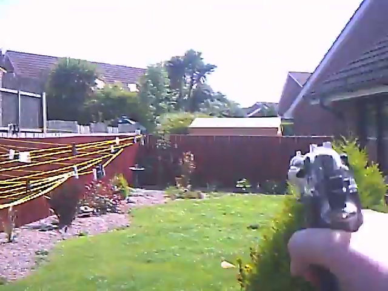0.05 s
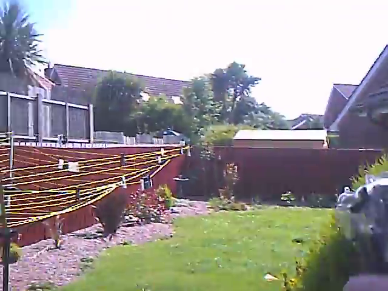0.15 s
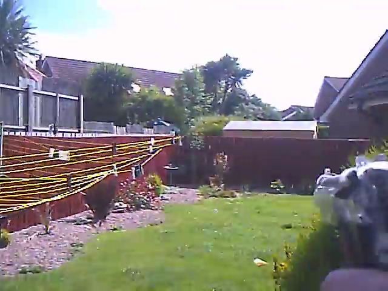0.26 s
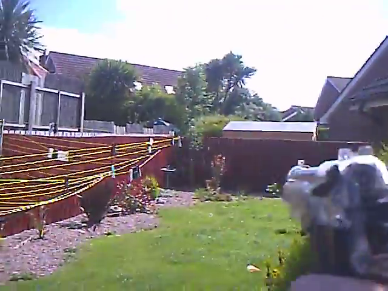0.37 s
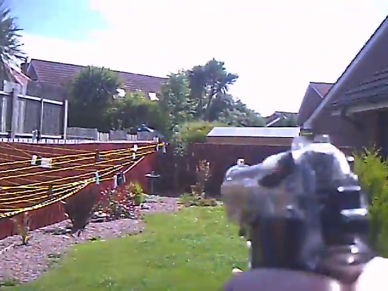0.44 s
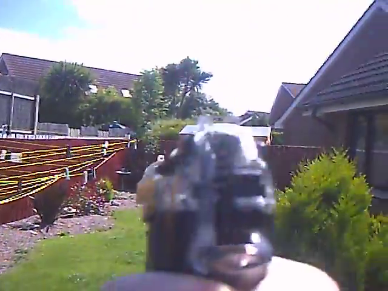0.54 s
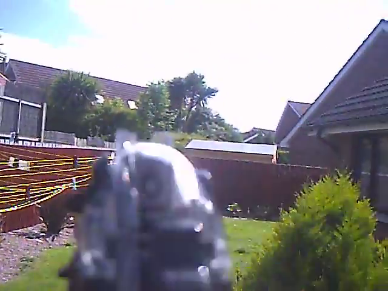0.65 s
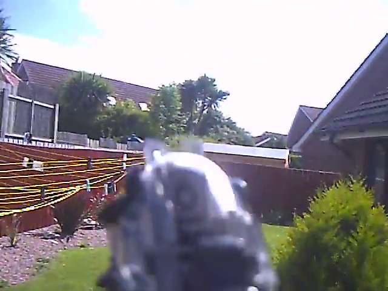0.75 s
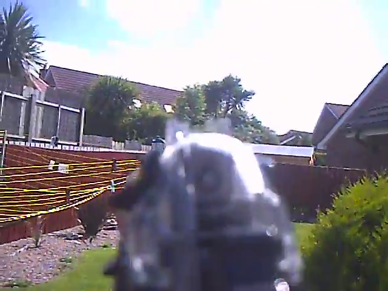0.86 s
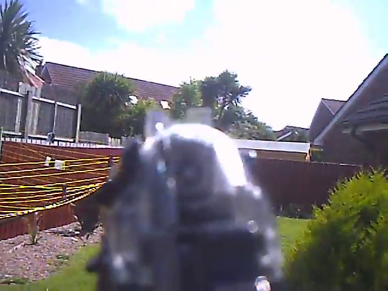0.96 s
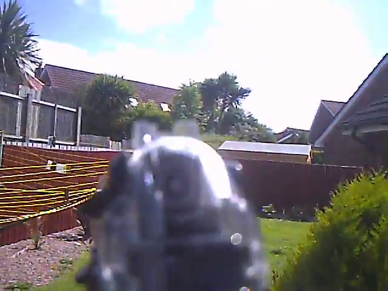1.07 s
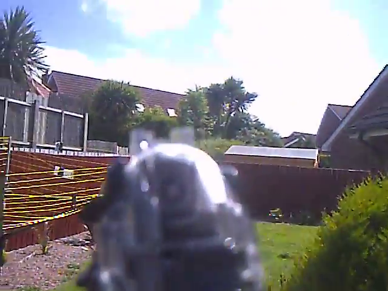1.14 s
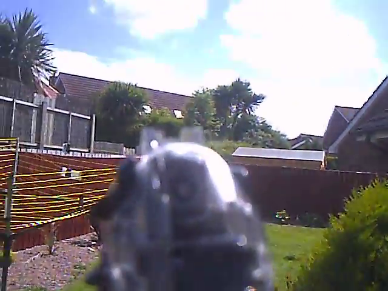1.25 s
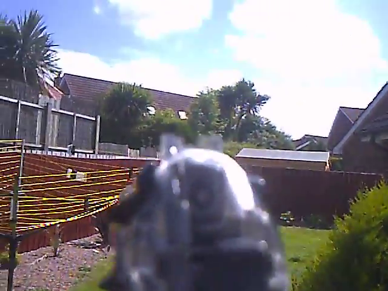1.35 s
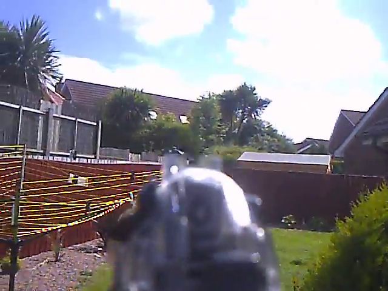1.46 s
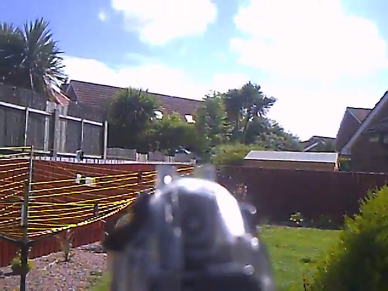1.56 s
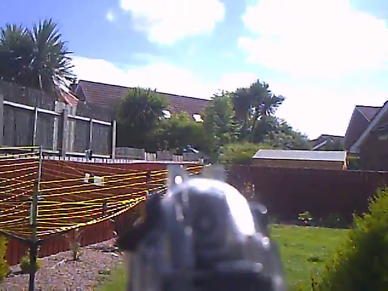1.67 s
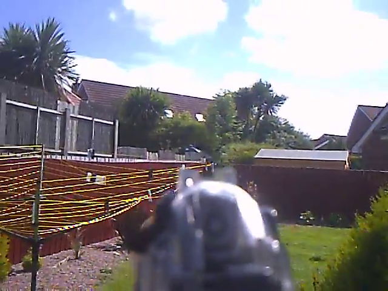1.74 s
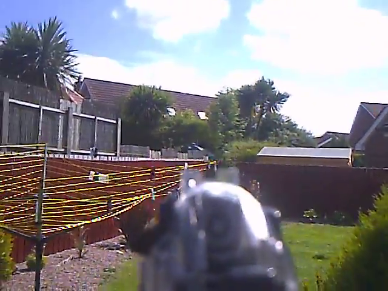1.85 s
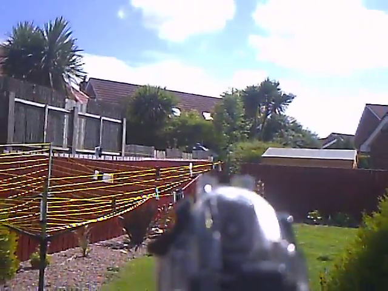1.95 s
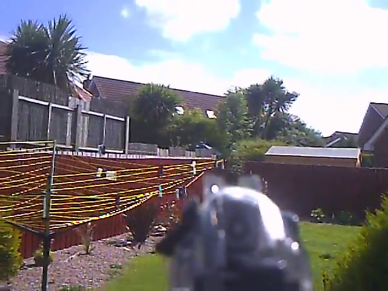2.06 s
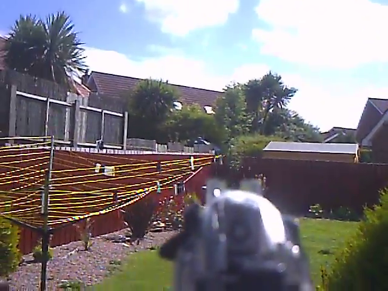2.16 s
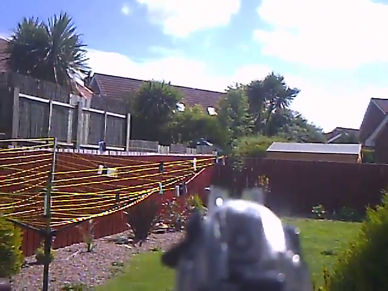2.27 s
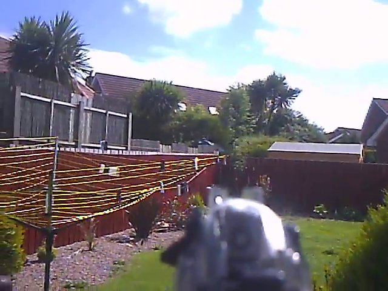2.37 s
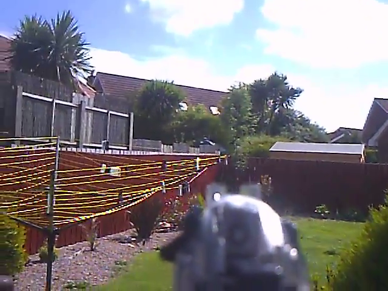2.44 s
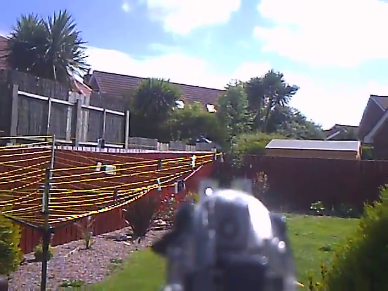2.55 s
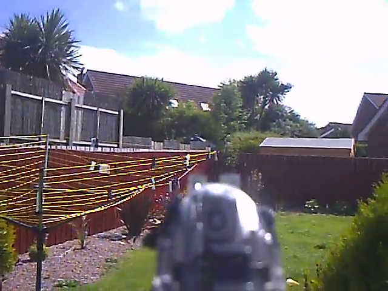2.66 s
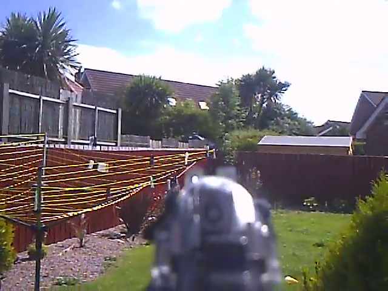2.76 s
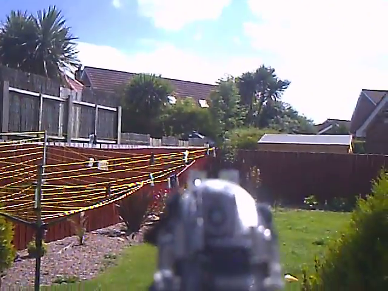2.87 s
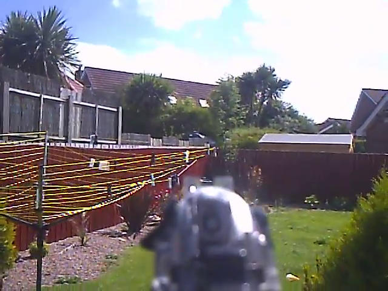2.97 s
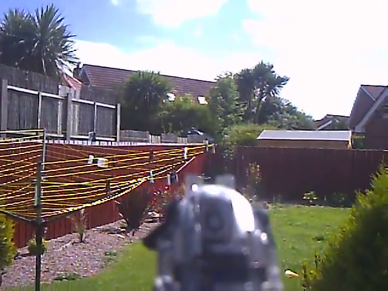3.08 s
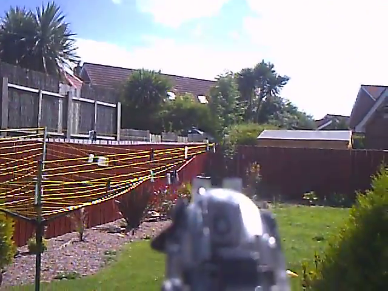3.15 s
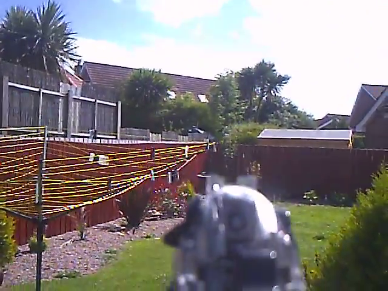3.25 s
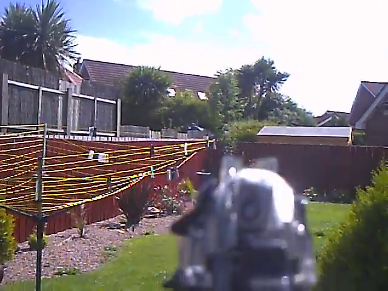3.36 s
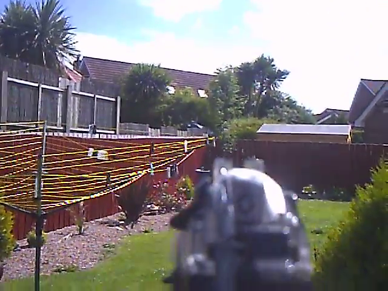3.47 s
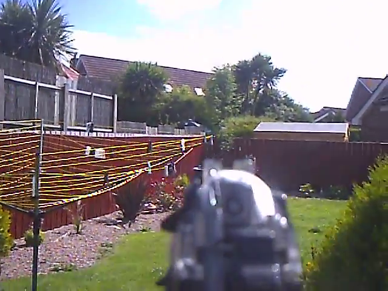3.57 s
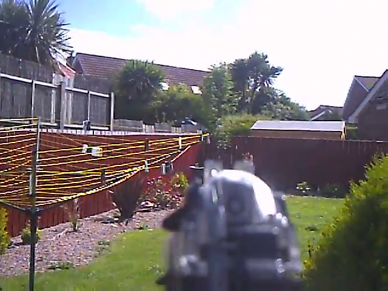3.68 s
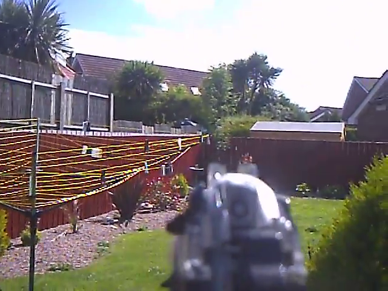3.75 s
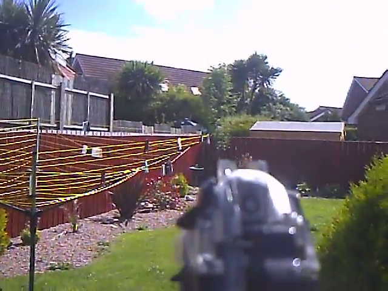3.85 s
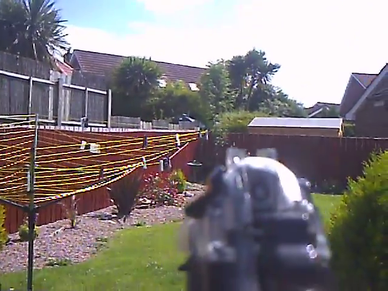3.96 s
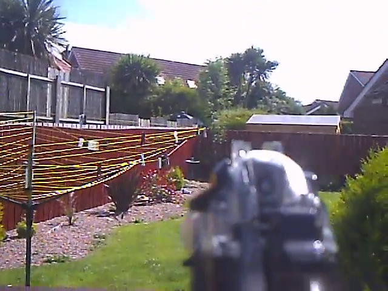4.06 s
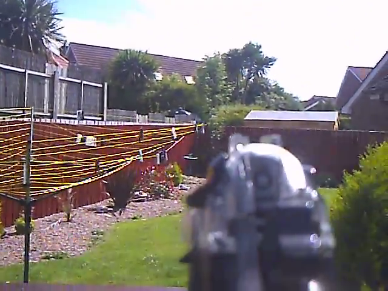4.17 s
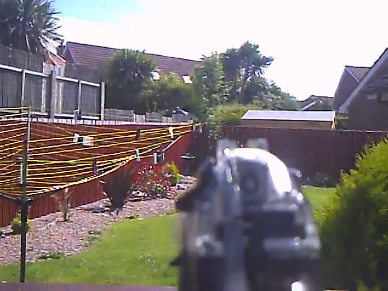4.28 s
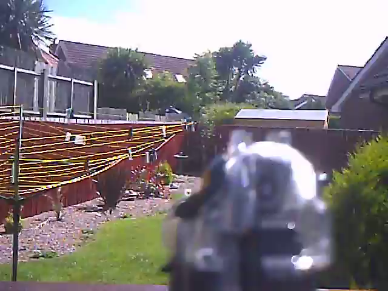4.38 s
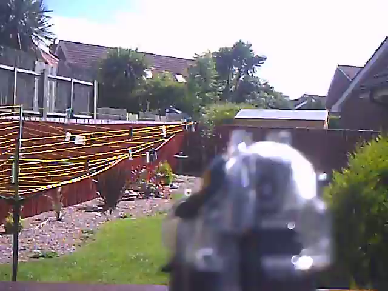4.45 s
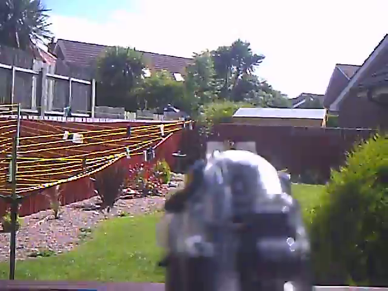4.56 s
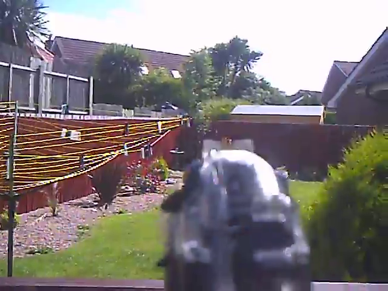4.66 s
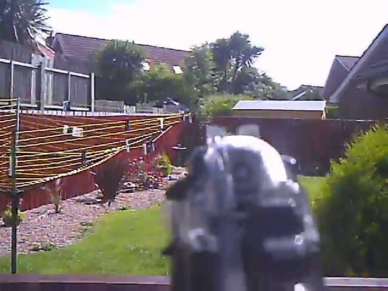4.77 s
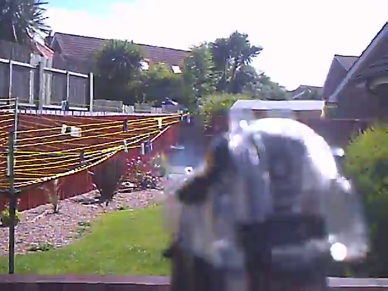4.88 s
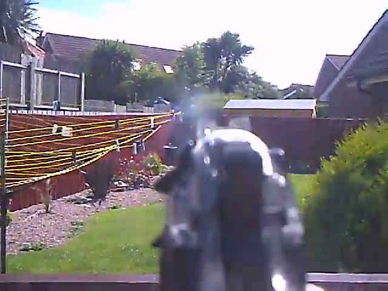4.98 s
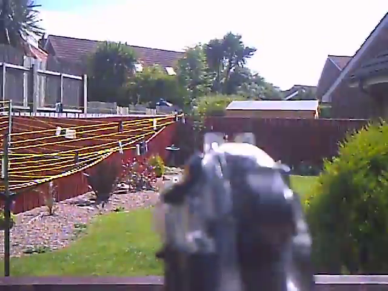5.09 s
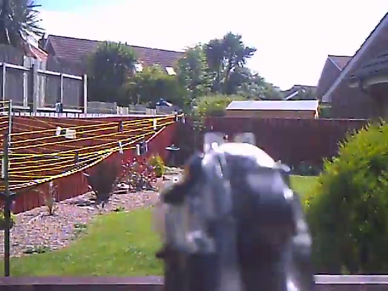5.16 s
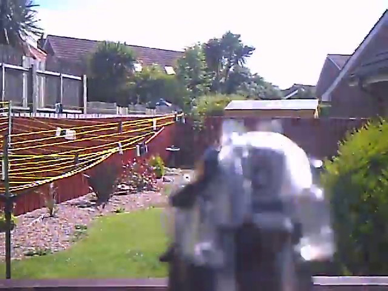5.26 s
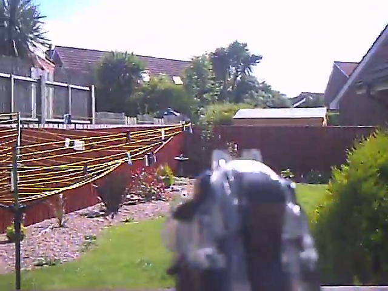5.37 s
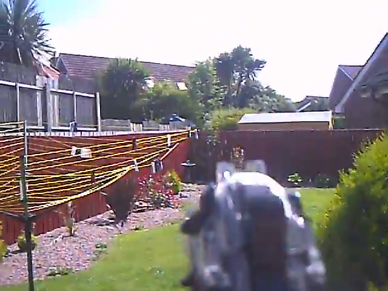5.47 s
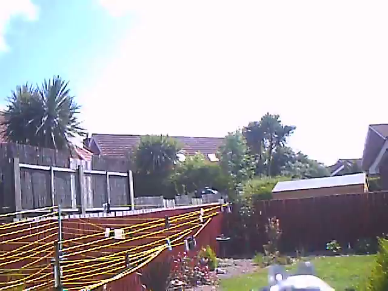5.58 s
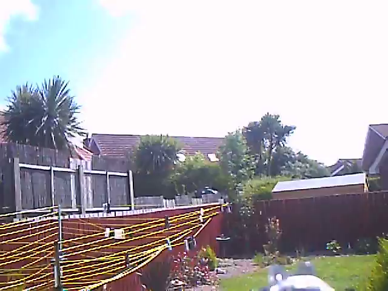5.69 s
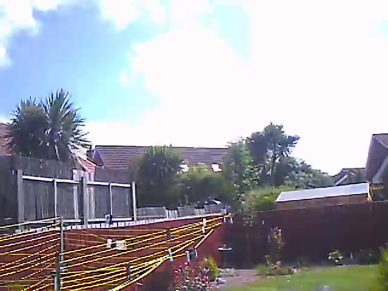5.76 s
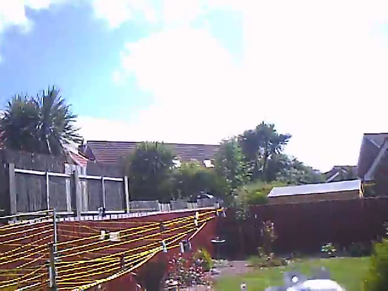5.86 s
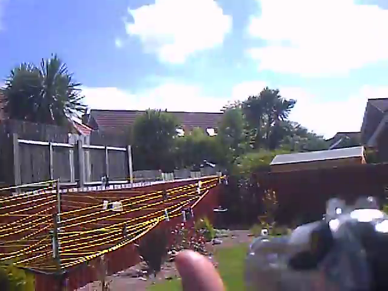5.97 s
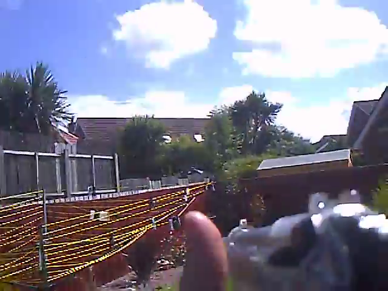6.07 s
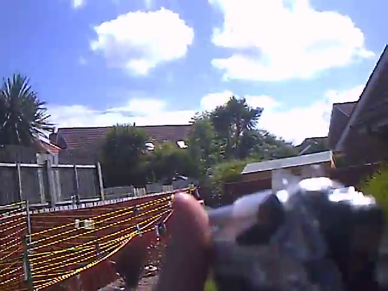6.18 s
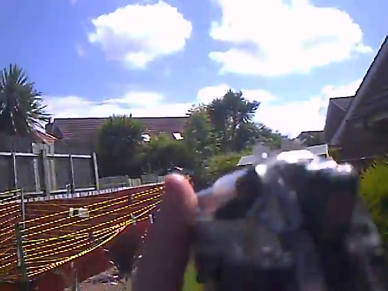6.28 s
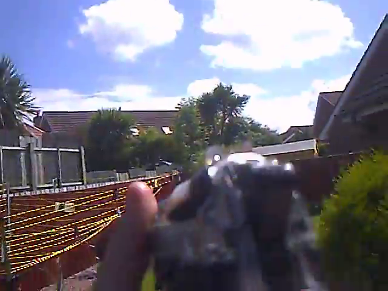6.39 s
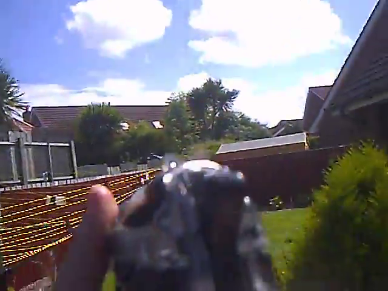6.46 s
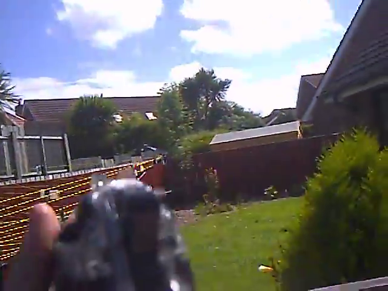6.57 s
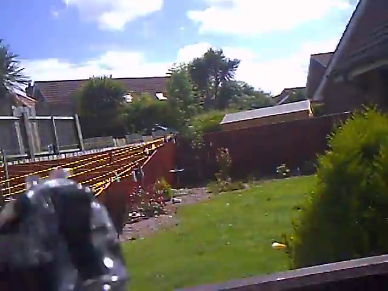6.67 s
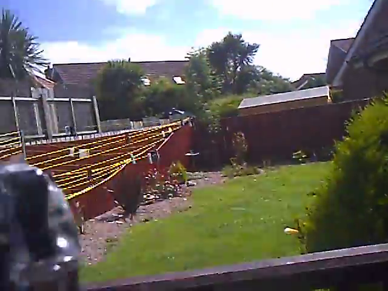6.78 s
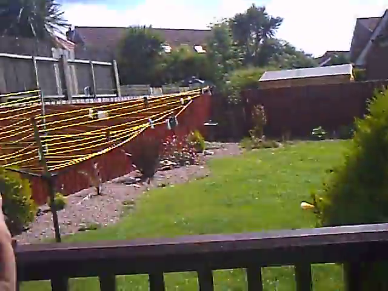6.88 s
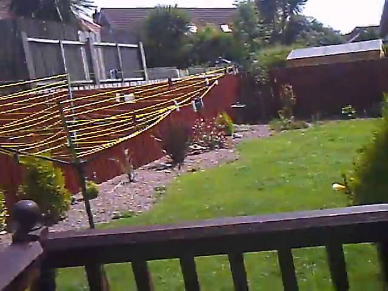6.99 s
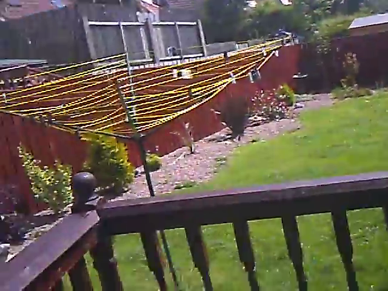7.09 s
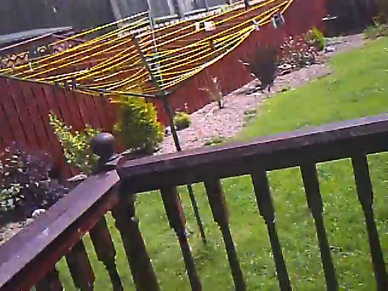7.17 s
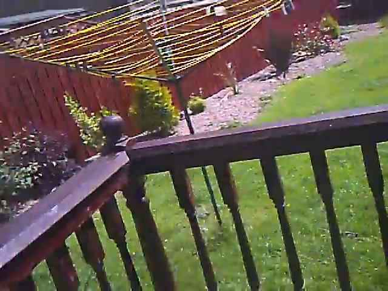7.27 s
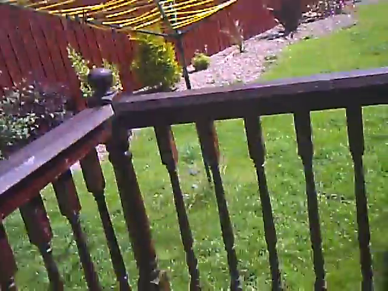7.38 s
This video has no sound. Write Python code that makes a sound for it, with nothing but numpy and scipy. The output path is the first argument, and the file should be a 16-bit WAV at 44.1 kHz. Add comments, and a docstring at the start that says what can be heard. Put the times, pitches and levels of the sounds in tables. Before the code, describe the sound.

A gas airsoft pistol fires eight sharp, clacking shots close by in a garden, with hand creaks and rubs on the microphone.

```python
"""Airsoft pistol in a back garden

Eight shots from a gas blowback pistol, an arm's length from the microphone of a small handheld camera.
Each is a hammer tap, a blast of gas, the slide ringing on its stop and clacking shut; pellets tick on
things further off, over the hum of a distant town. Right at the microphone the hand makes the plastic
case rub and creak. The camera's coarse converter clips the shots and turns the quiet into grainy hiss."""
import sys
import numpy as np
from scipy import signal
from scipy.fft import rfft, irfft
from scipy.io import wavfile

SR = 44100
rng = np.random.default_rng(int(sys.argv[2]) if len(sys.argv) > 2 else 0)


def log_audio(samples):
    """Write samples as a 16-bit WAV file to the path given in sys.argv[1]."""
    # one column per channel
    frames = np.atleast_2d(samples).T
    # limit to full scale, then quantise
    limited = np.clip(frames, -1, 1)
    pcm = np.round(limited * 32767).astype(np.int16)
    wavfile.write(sys.argv[1], SR, pcm)


N = 327663
T = np.arange(SR // 5) / SR  # time within one short sound [s]

# the shots, at arm's length; levels are relative: (time [s], blast level [dB], hammer level [dB],
# delay to the rear stop [s], stop level [dB], delay until the slide shuts [s], shut level [dB])
SHOTS = [(3.3607, 0.5, -35, 0.029, -6.5, 0.058, 1), (4.1092, 0.5, -37.5, 0.028, 1.5, 0.059, 0.5),
         (4.5108, -1.5, -39, 0.026, 3.5, 0.062, 0.5), (4.7815, -1.5, -39, 0.026, 3.5, 0.06, 1),
         (5.027, -2, -45, 0.028, 2.5, 0.06, 2), (5.25, -3.5, -44, .0303, 2, 0.059, 1),
         (5.7655, -2, -24, .0315, -4, 0.055, 1.5), (6.327, -2.5, -19, 0.029, -11.5, 0.049, 1.5)]
# colour of the gas blast: (frequency [Hz], level [dB])
GAS_COLOUR = [(20, -27.5), (60, -6), (170, 3), (280, -5), (430, -2), (650, -3.5), (1000, 1), (1400, -6),
              (1850, 5), (2700, -11), (3600, -9), (4600, -2), (5600, -18.5), (7000, -12), (8300, -23),
              (10000, -19.5), (13000, -37.5)]
# colour of the puff from the vent: (frequency [Hz], level [dB])
VENT_COLOUR = [(30, -15), (120, -7), (230, -9.5), (430, -4), (800, -4.5), (1200, -11.5), (2500, -37),
               (13000, -54)]
# rapid fire chills the magazine, so the last blasts hiss and vent less: (time [s], chill [0-1])
MAGAZINE_CHILL = [(5.25, 0), (5.77, 0.72), (6.33, 1)]
# colour of steel striking steel: (frequency [Hz], level [dB])
STEEL_COLOUR = [(30, -28), (100, -21), (300, -22.5), (700, -8.5), (1150, 7), (1420, -6), (1750, -4.5),
                (2300, -4.5), (3300, -7.5), (4400, -10), (5500, -20), (7200, -20), (12000, -43),
                (14000, -52)]
# modes of the gas chamber: (frequency [Hz], level [dB], t60 [s])
CHAMBER_MODES = [(425, -6.5, 0.085), (545, -11, 0.054), (880, -6, 0.044), (1829, -8.5, .06),
                 (4540, -9.5, 0.04)]
# modes of the slide on its stop: (frequency [Hz], level [dB], t60 [s])
SLIDE_MODES = [(1084, -31, 0.047), (1703, -23.5, 0.071), (1923, -12, 0.031), (2944, -21, .04),
               (4356, -0.5, 0.013), (4410, -6.5, 0.017), (6300, -34, 0.042), (7080, -12, .015),
               (9000, -21, 0.018), (11600, -25, 0.017)]
# the slide's blow on its stop and its bounce: (delay [s], level [dB])
STOP_BLOWS = [(0, 1), (0.0073, -6.5)]
# modes of the closed frame: (frequency [Hz], level [dB], t60 [s])
FRAME_MODES = [(950, -14, 0.057), (1199, -4.5, 0.046), (1665, -10.5, 0.033), (2132, -1.5, 0.034),
               (2810, -10.5, 0.036), (4420, -1.5, 0.025)]
# a loose part of the pistol, then pellets landing further off: (time [s], level [dB])
TICKS = [(0.2802, -32.5), (3.530, -28), (4.2535, -27.5), (4.609, -28.5), (4.877, -27.5), (5.33, -32),
         (5.3607, -26.5), (5.6132, -29.5), (5.9134, -26.5), (5.953, -29.5), (6.483, -26), (6.528, -29)]
# colour of a dry tick: (frequency [Hz], level [dB])
TICK_COLOUR = [(60, -15), (500, -6.5), (1000, 9.5), (1900, 1), (3000, -6.5), (4700, -3.5), (5800, -10.5),
               (7200, -13), (8500, -12.5), (10000, -8.5), (12000, -34.5), (14000, -34)]

# creaks right at the microphone: (time [s], length [s], first gap [s], first slip level [dB])
CREAKS = [(0.1282, .052, 0.017, -9.5), (.3078, .007, 0.0044, -13), (.4336, .002, .03, -6),
          (0.4667, .01, 0.0092, -12), (0.843, .006, 0.0049, -5), (0.8666, .037, 0.014, -9),
          (5.448, .002, .03, -14), (5.4796, .03, 0.015, -21), (5.6527, .024, 0.016, -22.5),
          (5.869, .022, .017, -19), (6.196, .014, 0.013, -7), (6.2418, .039, .0125, -10),
          (6.6161, .063, 0.015, -10.5)]
# modes of the camera's case after a slip: (frequency [Hz], level [dB], t60 [s])
CASE_MODES = [(58.8, -21, .06), (445, -48, 0.009), (990, -16, .02), (1450, -14, 0.0084), (1930, -22, 0.016)]
# the hand takes a fresh hold and the case gives inwards: (time [s], level [dB])
GRABS = [(0.3948, -9), (0.8352, -15.5), (6.1855, -8)]
# a weaker jolt comes before and after a grab's main one: (delay [s], level [dB])
GRAB_JOLTS = [(-0.00229, -6.5), (0, 0), (0.006, -6.5)]
# skin rubbing on the case: (time [s], length [s], level [dB])
RUBS = [(0.112, 0.12, -40), (0.277, 0.06, -38.5), (0.354, 0.022, -37), (.385, 0.058, -31),
        (.438, 0.083, -42.5), (0.823, 0.037, -26), (0.857, 0.066, -34), (1.086, 0.043, -46.5),
        (6.117, 0.035, -36.5), (6.177, 0.035, -29.5), (6.213, 0.083, -33), (6.497, 0.021, -34.5),
        (6.614, 0.081, -39.5), (6.705, 0.0097, -30.5), (7.368, 0.04, -35.5)]
# colour of skin on plastic: (frequency [Hz], level [dB])
RUB_COLOUR = [(40, -5.5), (130, 2), (350, -2), (600, -7.5), (940, -1), (1120, -3), (1380, -1), (1650, -4.5),
              (2300, -13), (3200, -16.5), (5000, -24.5), (12000, -36.5)]
# fingers knocking on the case: (time [s], level [dB])
KNOCKS = [(0.506, -25), (0.9349, 1.5), (1.11, -22), (1.121, -23.5), (6.021, -25), (6.094, -18.5)]
# modes of the knocked case: (frequency [Hz], level [dB], t60 [s])
KNOCK_MODES = [(494, -11, 0.015), (955, -13.5, 0.023), (1750, -20, 0.018)]
# harmonics of a fingertip's squeak: (multiple of the pitch, level [dB])
SQUEAK_HARMONICS = [(1, 1), (2, -20), (3, -14)]
# spells of restless grip: (start [s], end [s], scuff level [dB])
FIDGETS = [(0.184, .82, -50), (6.002, 6.18, -44.5), (6.721, 7.35, -52.5)]

# the garden's echo at the microphone: (frequency [Hz], level [dB], t60 [s])
GARDEN_BANDS = [(60, -13.5, 1), (449, -9.5, .45), (1190, -3, 0.49), (1910, -1.5, 0.43), (2830, 3.5, 0.34),
                (4400, -2, 0.37), (6000, 3, 0.36), (12000, -4, 0.26)]
# colour of the distant town: (frequency [Hz], level [dB])
TOWN_COLOUR = [(20, -2), (60, 4.5), (150, -3), (300, -6.5), (520, -11), (720, -5.5), (860, 1.5),
               (1050, -3.5), (1400, -11.5), (2000, -16), (3000, -25), (12000, -21.5)]

HAMMER_LEAD_S, VENT_LEAD_S = 0.011, 0.0097  # ahead of the blast; ahead of the rear stop
CHILL_HISS_DB, CHILL_VENT_DB = -4.5, -13  # at full chill
SLIP_WIDTH_S, SLIP_SHARPEN = 0.0002, 0.86  # a faint slip's pulse; strong ones are narrower
LAST_GAP_S, GAP_SHRINK, GAP_JITTER = 0.0042, 0.46, 0.12  # slips crowd together as the grip gives way
SLIP_FADE_DB, SLIP_SPREAD_DB = -3, 2.5  # fade each time their number doubles; random spread
GRAB_RING_DB, GRAB_RING_T60_S = -14, 0.054  # the case rings after the main jolt
RUB_ATTACK_S, RUB_RELEASE_S, RUB_EASE_DB = 0.0023, 0.0055, -6  # pressure eases over the stroke
CHATTER_HZ, CHATTER_DB, CHATTER_GROWTH = 1380, -24.5, 1.7  # level in the hardest rub; dB per dB of rub
SCUFFS_PER_S, SCUFF_S, SCUFF_SPREAD_DB = 14, 0.02, 7
SQUEAK_HZ, SQUEAK_SAG_HZ_PER_S = 1050, 2800
SQUEAK_DB, SQUEAK_HOLD_S, SQUEAK_FADE_DB_PER_S = -35.5, 0.036, 287
CONVERTER_HZ, TREBLE_EDGE_HZ = 24500, 16100


def gas_blasts():
    """The gas sputters out, vents as the slide moves back and drops as the valve closes."""
    out = np.zeros(N)
    for s, blast_db, _, recoil_s, *_ in SHOTS:
        chill = np.interp(s, *np.transpose(MAGAZINE_CHILL))
        vent_s = recoil_s - VENT_LEAD_S
        valve = amp(np.interp(T, [vent_s, recoil_s], [0, -6]) + 2 * flutter(rate=700))
        colour = [(hz, db + chill * CHILL_HISS_DB * (hz > 6000)) for hz, db in GAS_COLOUR]
        add(out, s - 0.0008, amp(blast_db - 1.74) * burst(colour, rise=0.0014, t60=0.13) * valve)
        pop = amp(1) * vent_pop(hz=571, length=0.00084)
        puff = amp(-4.5) * burst(VENT_COLOUR, rise=0.001, t60=0.025)
        add(out, s + vent_s, amp(chill * CHILL_VENT_DB) * (pop + puff))
    return out


def vent_pop(hz, length):
    """The slide uncovers the chamber, which gives a short hollow pop."""
    pitch = hz * rng.uniform(0.686, 1.283)
    age = T / length
    return -np.sin(2 * np.pi * pitch * T) * age * np.exp(1 - age)


def hammer_and_return():
    """The hammer falls and the valve cracks open; later the slide scrapes home, shuts and rebounds."""
    out = np.zeros(N)
    for s, _, hammer_db, _, _, cycle_s, shut_db in SHOTS:
        tap = burst(STEEL_COLOUR, rise=0.0012, t60=0.034) + amp(-4) * ring(FRAME_MODES, detune=0.037)
        add(out, s - HAMMER_LEAD_S, amp(hammer_db) * tap)
        add(out, s - 0.003, amp(-14.5) * burst(GAS_COLOUR, rise=0.0026, t60=0.03))  # the valve
        scrape = amp(shut_db - 20) * burst(TICK_COLOUR, rise=0.003, t60=0.05)
        clack = amp(shut_db - 9.5) * burst(STEEL_COLOUR, rise=0.00078, t60=0.044)
        rebound = amp(shut_db - 16) * burst(STEEL_COLOUR, rise=0.0011, t60=0.04)
        shut_s = s + cycle_s
        add(out, shut_s - 0.0075, scrape)
        add(out, shut_s - 0.0015, clack)
        add(out, shut_s + 0.007, rebound)
    return out


def slide_stop():
    """The slide slams into its rear stop and bounces; a hard blow rings, a soft one is mostly crack."""
    out = np.zeros(N)
    for s, _, _, recoil_s, stop_db, *_ in SHOTS:
        for delay, db in STOP_BLOWS:
            ringing = amp(stop_db) * ring(SLIDE_MODES, detune=0.016)
            crack = amp(-5) * burst(TICK_COLOUR, rise=0.00038, t60=0.0092)
            add(out, s + recoil_s + delay, amp(db) * (ringing + crack))
    return out


def pistol_body():
    """The rush of gas sets the chamber ringing; the frame rings when the slide shuts."""
    out = np.zeros(N)
    for s, blast_db, *_, cycle_s, shut_db in SHOTS:
        chamber = ring(CHAMBER_MODES, detune=0.022) * np.minimum(T / 0.0021, 1)
        add(out, s - 0.0008, amp(blast_db - 0.5) * chamber)
        add(out, s + cycle_s, amp(shut_db - 10) * ring(FRAME_MODES, detune=0.03))
    return out


def ticks():
    """Small dry taps of plastic: a loose part close by, pellets landing across the garden."""
    out = np.zeros(N)
    for s, db in TICKS:
        add(out, s, amp(db) * burst(TICK_COLOUR, rise=0.00037, t60=0.035))
    return out


def creaks(count=16):
    """The case sticks and slips under the hand, ever faster and weaker; a strong slip is sharper."""
    out, k = np.zeros(N), np.arange(count)
    for s, length, first_gap, db in CREAKS:
        timing, strength = rng.standard_normal((2, count))
        gaps = (LAST_GAP_S + (first_gap - LAST_GAP_S) * GAP_SHRINK ** k) * (1 + GAP_JITTER * timing)
        delays = np.cumsum(gaps) - gaps
        heights = amp(db + SLIP_FADE_DB * np.log2(1 + k) + SLIP_SPREAD_DB * strength * (k > 0))
        for delay, height in zip(delays, heights):
            width = SLIP_WIDTH_S / (1 + SLIP_SHARPEN * height)
            add(out, s + delay - 0.0006, -height * (delay <= length) * slip(width))
    return out


def slip(width):
    """One slip: a single pressure pulse at the microphone, then the case rings."""
    pulse = np.exp(-((T - 0.0006) / width) ** 2)
    onset = np.clip(T / 0.0002 - 1, 0, 1)
    return pulse + amp(-2.5) * ring(CASE_MODES, detune=0.02) * onset


def handling():
    """The grip shifts right beside the microphone: fresh holds, rubs and knocks."""
    out = np.zeros(N)
    for s, db in GRABS:
        for delay, jolt_db in GRAB_JOLTS:
            add(out, s + delay - 0.0006, amp(db + jolt_db) * slip(width=0.00029))
        add(out, s, amp(db) * ring([(CHATTER_HZ, GRAB_RING_DB, GRAB_RING_T60_S)], detune=0.03))
    for s, length, db in RUBS:
        add(out, s, rub(length, db))
    for s, db in KNOCKS:
        add(out, s, -amp(db) * ring(KNOCK_MODES, detune=0.0029) * (1 - np.exp(-T / 0.00033)))
    return out


def rub(length, db):
    """Skin drags over plastic; the harder it presses, the more the case chatters at one pitch."""
    contact = np.clip(np.minimum(T / RUB_ATTACK_S, (length - T) / RUB_RELEASE_S), 0, 1)
    pressure = contact * amp(RUB_EASE_DB * np.minimum(T / length, 1))
    hiss = amp(db + 3.7 * flutter(rate=200)) * noise(RUB_COLOUR, len(T))
    chatter_hz = CHATTER_HZ * (1 + 0.06 * flutter(rate=450))
    chatter = np.sin(2 * np.pi * np.cumsum(chatter_hz) / SR)
    hardest_db = max(row[-1] for row in RUBS)
    return pressure * (hiss + chatter * amp(CHATTER_DB + CHATTER_GROWTH * (db - hardest_db)))


def squeak():
    """A fingertip chatters unevenly on the plastic, its pitch sagging as it comes to rest."""
    hz = SQUEAK_HZ - SQUEAK_SAG_HZ_PER_S * T
    db = SQUEAK_DB - SQUEAK_FADE_DB_PER_S * np.maximum(T - SQUEAK_HOLD_S, 0)
    turns = np.cumsum(hz * (1 + 0.12 * flutter(rate=480))) / SR
    tone = sum(amp(part_db) * np.sin(2 * np.pi * k * turns) for k, part_db in SQUEAK_HARMONICS)
    out = np.zeros(N)
    add(out, 0, amp(db + 2.8 * flutter(rate=300)) * (tone + amp(-5.5) * noise(RUB_COLOUR, len(T))))
    return out


def scuffs():
    """Restless fingers brush the case at random moments."""
    out = np.zeros(N)
    for start, end, db in FIDGETS:
        for s in np.arange(start, end, 1 / SCUFFS_PER_S):
            delay = rng.random() / SCUFFS_PER_S
            add(out, s + delay, rub(SCUFF_S, db + SCUFF_SPREAD_DB * rng.standard_normal()))
    return out


def garden_echo(sound, build_s, echoes_per_s=2500):
    """Fences, shrubs and walls scatter a thin tail, each band dying at its own speed."""
    t = np.arange(SR) / SR
    echoes = rng.standard_normal(SR) * (rng.random(SR) < echoes_per_s / SR)
    hz, frame_s, spectrum = signal.stft(echoes * (1 - np.exp(-t / build_s)), SR, nperseg=256)
    band_hz, band_db, band_t60 = np.transpose(GARDEN_BANDS)
    db = curve(np.c_[band_hz, band_db], hz)[:, None]
    t60 = curve(np.c_[band_hz, band_t60], hz)[:, None]
    tail = signal.istft(spectrum * amp(db - 60 * frame_s / t60), SR, nperseg=256)[1]
    return signal.fftconvolve(sound, tail / np.linalg.norm(tail))[:N]


def distant_town():
    """The steady hum of a town, far beyond the fence."""
    return amp(-56) * noise(TOWN_COLOUR, N)


def burst(colour, rise, t60):
    """A puff of noise that swells quickly and dies away."""
    return noise(colour, len(T)) * (1 - np.exp(-(T / rise) ** 2)) * amp(-60 * T / t60)


def ring(modes, detune):
    """A struck body; every blow shifts the modes a little."""
    return sum(amp(db - 60 * T / t60) * np.sin(2 * np.pi * hz * (1 + detune * rng.standard_normal()) * T)
               for hz, db, t60 in modes)


def noise(colour, size):
    """Noise of rms 1 with a given colour."""
    gains = amp(curve(colour, np.fft.rfftfreq(size, 1 / SR)))
    shaped = irfft(rfft(rng.standard_normal(size)) * gains, size)
    return shaped / shaped.std()


def flutter(rate):
    """A random wobble of rms about 1 that changes so many times a second."""
    return np.interp(T * rate, np.arange(500), 1.2 * rng.standard_normal(500))


def curve(points, hz):
    """Joins (frequency [Hz], value) points by straight lines on a log axis."""
    point_hz, value = np.transpose(points)
    return np.interp(np.log(hz + 1), np.log(point_hz + 1), value)


def amp(db):
    """Decibels to gain."""
    return 10 ** (np.asarray(db) / 20)


def add(mix, s, sound):
    """Lays a sound into the mix at a time."""
    part = mix[max(round(s * SR), 0):][:len(sound)]
    part += sound[:len(part)]


def scene():
    """At the one microphone: pistol and pellets, the garden's echo, the far town and the hand."""
    outward = gas_blasts() + hammer_and_return() + ticks()
    # the rear of the pistol faces the microphone, so little of its ring reaches the garden
    rings = slide_stop() + pistol_body()
    echo = amp(-21.5) * garden_echo(outward + amp(-13.5) * rings, build_s=0.012)
    town = distant_town()
    hand = creaks() + handling() + squeak() + scuffs()
    return (outward + rings + echo + town + hand)[None]


def record(dry):
    """The camera's slow, coarse converter rests off zero: loud sound clips, faint sound toggles steps."""
    ceiling, step, rest_in_steps, dc_offset = amp(-5), amp(-44.5), 0.3, -0.112
    clipped = np.clip(dry, -ceiling, ceiling)
    slow = signal.resample_poly(clipped, CONVERTER_HZ, SR, axis=1)
    stepped = step * np.round(slow / step + rest_in_steps)
    smoothing = signal.firwin(721, 1 / 9, window=("kaiser", 8))
    grainy = signal.resample_poly(stepped, SR, CONVERTER_HZ, axis=1, window=smoothing)[:, :N]
    # a little of the splatter from the clipped peaks leaks through above the converter's band
    above_band = signal.butter(6, CONVERTER_HZ / 2, "high", fs=SR, output="sos")
    splatter = amp(-12) * signal.sosfilt(above_band, clipped - dry)
    treble_edge = signal.firwin(511, TREBLE_EDGE_HZ, window=("kaiser", 9), fs=SR)
    return dc_offset + signal.oaconvolve(grainy + splatter, treble_edge[None], "same")


dry = scene()
out = record(dry)
log_audio(out)
```